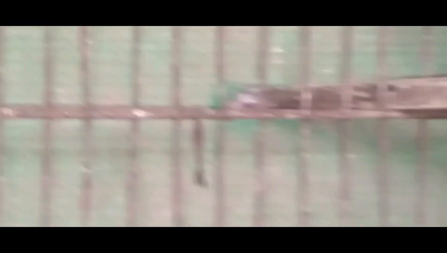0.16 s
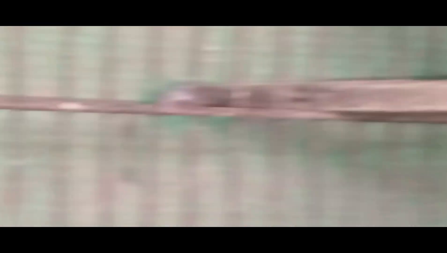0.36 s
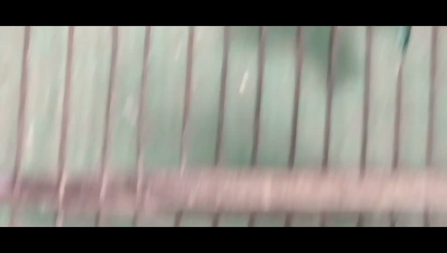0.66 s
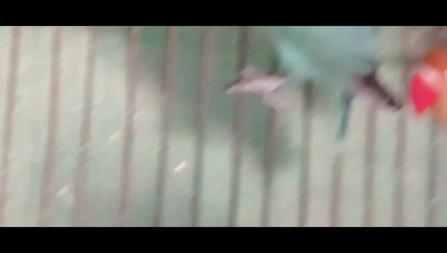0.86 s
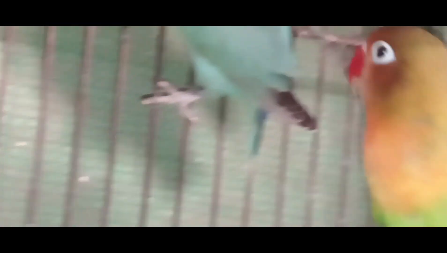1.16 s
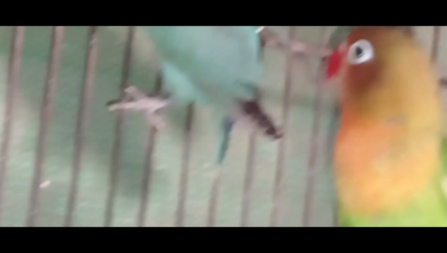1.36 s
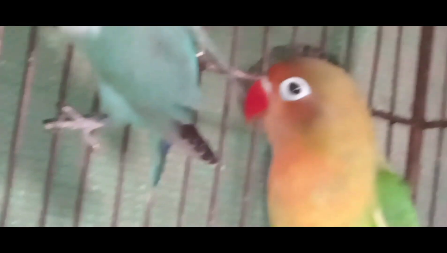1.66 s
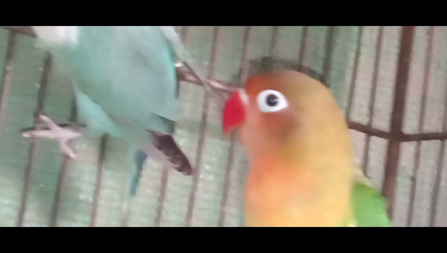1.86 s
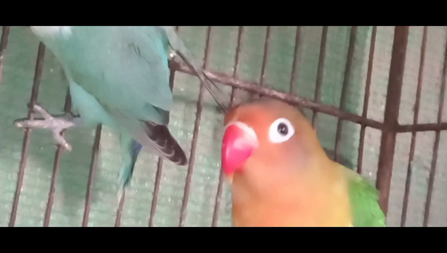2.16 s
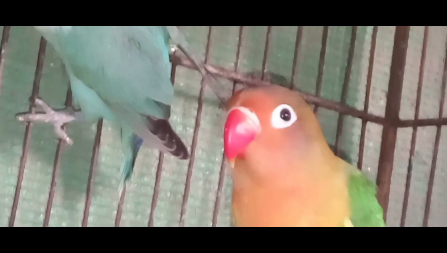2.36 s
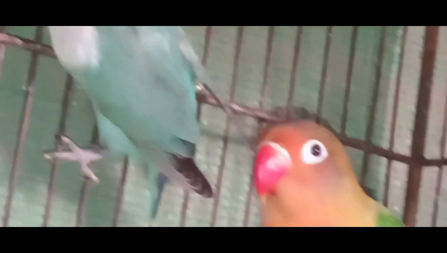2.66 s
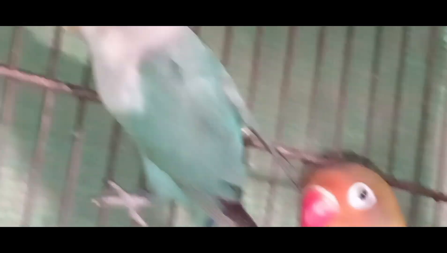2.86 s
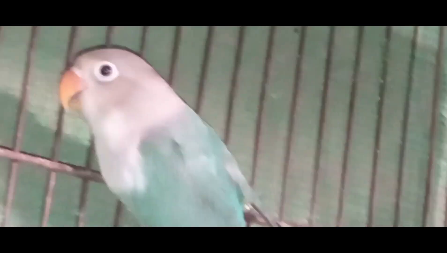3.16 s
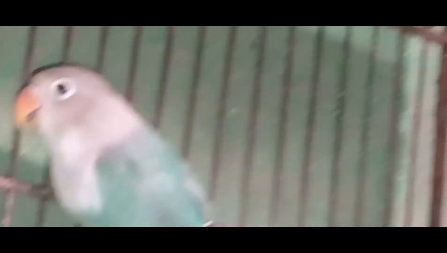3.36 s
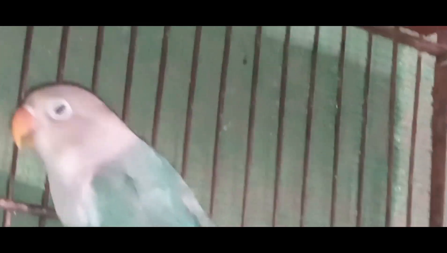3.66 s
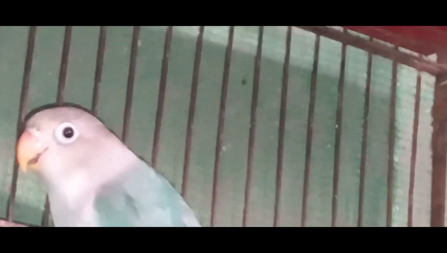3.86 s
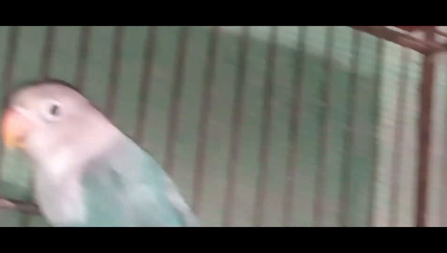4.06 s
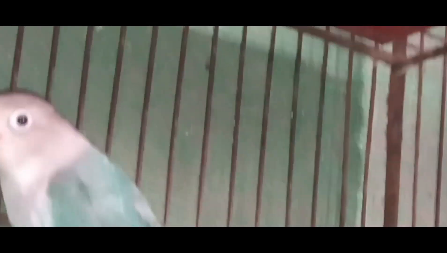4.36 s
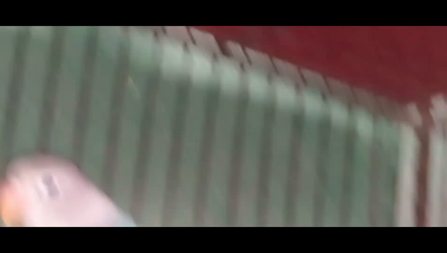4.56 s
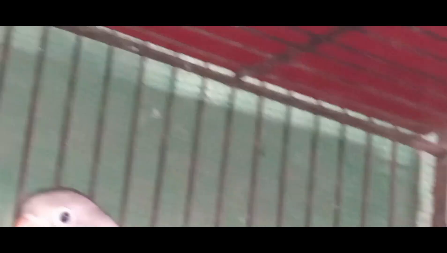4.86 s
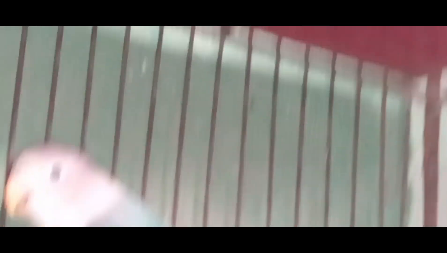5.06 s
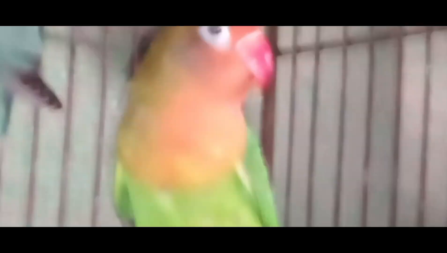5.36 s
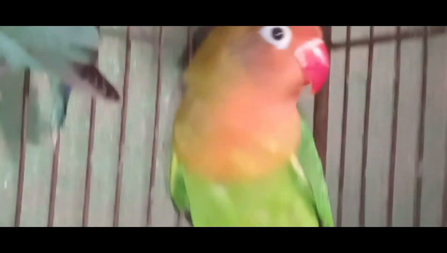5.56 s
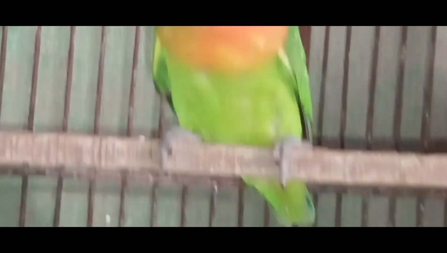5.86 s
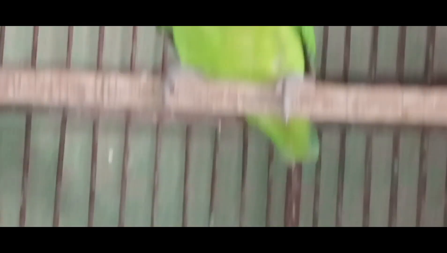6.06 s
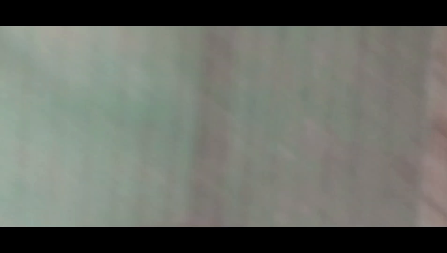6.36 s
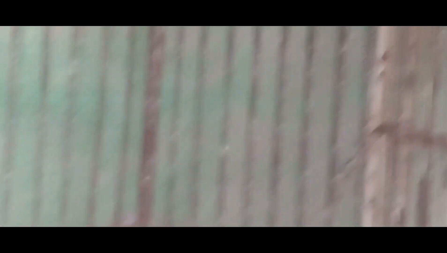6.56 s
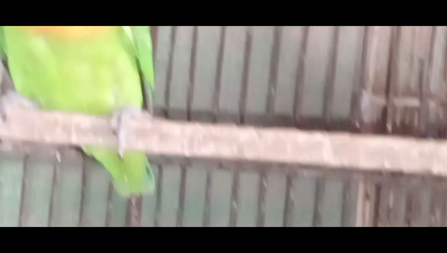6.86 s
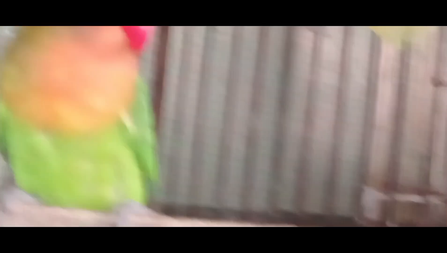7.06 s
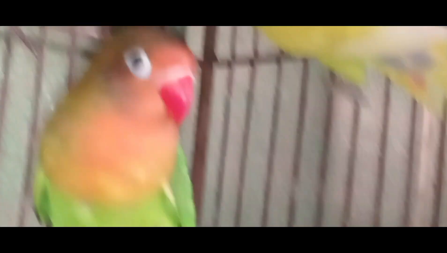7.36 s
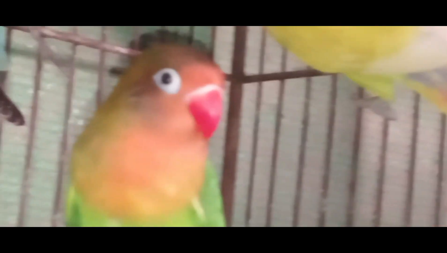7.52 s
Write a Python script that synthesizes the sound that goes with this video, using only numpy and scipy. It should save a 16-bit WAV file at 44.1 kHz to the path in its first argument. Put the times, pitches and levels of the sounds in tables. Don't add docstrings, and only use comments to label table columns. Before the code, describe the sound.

A steady fan rush and slowly beating mains hum fill a small echoing aviary. Two near whistles come early, then distant downward chirps, a harsh squawk, a third softer whistle with a sharp shriek, a hard perch knock and a fourth whistle. Quick peeps and claw taps crowd the last part, ending in low handling thumps. The handheld microphone briefly dips the background under loud calls.

```python
import sys
import numpy as np
from scipy import signal
from scipy.fft import rfft, irfft, next_fast_len
from scipy.io import wavfile
from scipy.ndimage import uniform_filter1d, map_coordinates

SR = 44100
rng = np.random.default_rng(int(sys.argv[2]) if len(sys.argv) > 2 else 0)


def transcribe(signal):
    frames = np.atleast_2d(signal).T
    limited = np.clip(frames, -1, 1)
    pcm = np.round(limited * 32767).astype(np.int16)
    wavfile.write(sys.argv[1], SR, pcm)


def ratio_of_db(decibels):
    return 10 ** (np.asarray(decibels, float) / 20)


N = 339129
T = np.arange(N) / SR


def unit(x):
    return x / np.sqrt(np.mean(x ** 2) + 1e-20)


def along(points, hz):
    f, v = np.transpose(points)
    return np.interp(np.log(hz + 1), np.log(f + 1), v)


def curves(rows):
    s, *cols = np.transpose(rows)
    return [np.interp(T, s, c) for c in cols] + [(T > s[0]) & (T < s[-1])]


def wobble(rate):
    return map_coordinates(rng.standard_normal(int(N * rate / SR) + 4), [T * rate])


def filtered(x, response):
    m = next_fast_len(N + SR // 2)
    return irfft(rfft(x, m) * response(np.fft.rfftfreq(m, 1 / SR)), m)[:N]


def turns(hz):
    return 2 * np.pi * np.cumsum(hz) / SR


def echoes(x, t60, gap):
    t = np.arange(SR // 2) / SR
    tail = rng.standard_normal(len(t)) * ratio_of_db(-60 * t / t60) * (t > gap)
    return signal.fftconvolve(x, tail / np.linalg.norm(tail))[:N]


def mains_hum():
    # pitch in Hz, level in dB; the first is the beating pair.
    hum_lines = [(100.4, 1), (200.8, -34), (258, -19), (301.2, -17)]
    second_share, first_null_s, beat_s = 0.92, 2.085, 4.08
    squeeze = 0.51
    (hz, db), *others = hum_lines
    phase = turns(hz + 0.16 * wobble(1.72))
    beat = 1 - second_share * np.exp(-2j * np.pi * (T - first_null_s) / beat_s)
    pair = np.imag(np.exp(1j * phase) * beat * np.abs(beat) ** (squeeze - 1))
    hum = np.sqrt(2) * ratio_of_db(db - 33 + 0.17 * wobble(14)) * pair
    for hz, db in others:
        hum += ratio_of_db(db - 31 + 2.85 * wobble(15)) * np.sin(turns(hz + 3 * wobble(11)))
    return hum


def fan():
    # frequency in Hz, level in dB per Hz.
    rush = [(15, -57), (32, -4), (48, 1), (150, 0.5), (260, -0.5), (480, -3), (1100, -6.5), (1500, -7.5),
            (2400, -7.5), (3300, -14.5), (6500, -16.5), (9500, -17), (12000, -28.5), (16000, -41.5)]
    # time in seconds, level in dB.
    ticking = [(0, -53.5), (.7, -50.5), (1.3, -56.5), (2, -59), (4, -65.5), (6.4, -57), (6.9, -50.5),
               (7.3, -50), (7.69, -49)]
    # frequency in Hz, level in dB.
    tick_colour = [(3000, -30), (6000, -8), (8500, 0), (10500, -6), (12500, -17), (15500, -21)]
    z = signal.stft(rng.standard_normal(N), nperseg=512)[2]
    patches = uniform_filter1d(rng.standard_normal(z.shape), size=8, axis=0)
    patches = uniform_filter1d(patches, size=8, axis=1)
    air = signal.istft(z * ratio_of_db(1.2 * unit(patches)), nperseg=512)[1][:N]
    air = unit(filtered(air, lambda f: ratio_of_db(along(rush, f))))
    air = ratio_of_db(-37 + 1.06 * wobble(1.3)) * air
    turn = turns(21.2 + .5 * wobble(2.3)) + 0.78
    rub = np.exp(2 * (np.cos(turn) - 1)) * ratio_of_db(2.5 * wobble(21))
    tick = unit(rub * filtered(rng.standard_normal(N), lambda f: ratio_of_db(along(tick_colour, f))))
    return air + ratio_of_db(curves(ticking)[0]) * tick


def knocks():
    # start in seconds, peak in dB, dull part in dB relative to the peak.
    clicks = [(0.176, -33, -3), (1.695, -23, -13), (1.7554, -27, 3), (4.139, -33, -13.5),
              (5.9364, -30.5, -13), (6.2588, -29, 0), (6.8987, -30.5, 2), (6.907, -26, -11),
              (7.0166, -24.5, 4), (7.0697, -27, -3), (7.446, -26, -12), (7.5717, -27, -11),
              (7.621, -30, -10), (7.634, -23, -10)]
    # start in seconds, level in dB, pitch in Hz.
    bumps = [
        (5.147, -7.5, 290),
        (6.2206, -19, 1000),
        (6.259, -9.5, 1900),
        (7.414, -21, 95),
        (7.471, -21, 68.2),
        (7.539, -16, 117),
        (7.605, -21, 69.4),
    ]
    # frequency in Hz, level in dB.
    wire_colour = [(500, -40), (4000, -13), (8500, -5.5), (11000, -11.5), (16000, -23)]
    perch_colour = [(250, -22), (800, -9.5), (2200, -3.5), (3800, -17), (7000, -31), (16000, -63)]
    wire, perch, swings = np.zeros((3, N + SR))
    t = np.arange(SR // 20) / SR
    for s, db, low_db in clicks:
        noise = rng.standard_normal((2, len(t))) * ratio_of_db(-60 * t / 0.038)
        wire[round(s * SR):][:len(t)] += ratio_of_db(db + 4.0) * noise[0]
        perch[round(s * SR):][:len(t)] += ratio_of_db(db + low_db + 7.0) * noise[1]
    for s, db, hz in bumps:
        swing = np.sin(2 * np.pi * hz * t) * np.exp(-t * hz * 3.55) * (1 - np.exp(-t / 0.00007))
        puff = 0.12 * ratio_of_db(-60 * t / 0.036) * (1 - np.exp(-t / 8e-4)) * rng.standard_normal(len(t))
        swings[round(s * SR):][:len(t)] += ratio_of_db(db + 7.0) * swing
        pull = np.exp(-((t * hz - .45) / 0.41) ** 2)
        swings[round((s - .6 / hz) * SR):][:len(t)] -= ratio_of_db(db - 13.0) * pull
        perch[round(s * SR):][:len(t)] += ratio_of_db(db) * puff
    dull = filtered(perch[:N], lambda f: ratio_of_db(along(perch_colour, f)))
    low = filtered(swings[:N], lambda f: 1j * f / (45 + 1j * f) / (1 + 1j * f / 2600) ** 2)
    return low + dull + filtered(wire[:N], lambda f: ratio_of_db(along(wire_colour, f)))


def far_birds():
    # start in seconds, length in seconds, top pitch in Hz, level in dB.
    far_calls = [(0.736, 0.17, 6680, -46), (1.187, 0.13, 7190, -45), (1.555, 0.13, 7040, -45.5),
                 (1.968, .1, 6300, -45), (3.475, 0.16, 6860, -38.5), (3.899, 0.13, 7020, -36),
                 (4.27, 0.14, 6760, -39), (4.627, .15, 6860, -38), (5.089, .16, 6580, -38.5),
                 (5.523, 0.12, 6170, -38), (5.835, 0.09, 5300, -41), (6.875, 0.16, 6290, -39),
                 (7.313, 0.14, 6600, -37)]
    # share of its length, share of its top pitch, level change in dB.
    sweep_shape = [(-.1, .86, -10), (0, 1, 0), (.22, .84, 4), (.5, .65, 0), (.75, .53, 3), (.92, .5, -3),
                   (1.15, .4, -14), (1.4, .33, -11), (1.65, .3, -17)]
    # start in seconds, peak in dB, pitch in Hz, length in seconds.
    peeps = [(0.623, -38, 2260, 0.02), (3.506, -27.5, 3280, 0.02), (3.5443, -36, 3290, 0.02),
             (3.713, -26.5, 3420, 0.022), (3.766, -33, 3470, 0.03), (4.197, -32, 3630, 0.015),
             (4.887, -30.5, 3490, 0.02), (6.045, -20.5, 3010, 0.0093), (6.143, -32, 3260, 0.018),
             (6.1918, -29, 3110, 0.024), (6.34, -27, 2905, 0.015), (6.483, -28, 2400, 0.015),
             (6.717, -30.5, 3840, 0.011), (6.781, -32, 3330, 0.016), (7.628, -29.5, 3110, 0.02),
             (0.628, -36, 3200, 0.026), (2.118, -29, 2380, 0.044), (6.265, -39, 3650, 0.05),
             (6.4, -38, 2110, .03), (6.535, -36, 3400, 0.044), (6.61, -32, 2150, 0.027),
             (6.734, -32, 2300, 0.019), (7.095, -36, 2080, .04)]
    # time in seconds, pitch in Hz, level in dB.
    squeal = [(3.09, 15014, -78), (3.102, 14968, -67), (3.248, 15027, -57), (3.36, 14752, -66),
              (3.378, 14782, -59), (3.49, 14678, -74), (3.5, 14340, -95)]
    out = np.zeros(N)
    for s, length, top_hz, db in far_calls:
        rows = [(s + u * length, share * top_hz, db + d) for u, share, d in sweep_shape]
        hz, level_db, gate = curves(rows)
        phase = turns(hz * (1 + 0.034 * wobble(350)))
        x = gate * ratio_of_db(level_db + 1.64 * wobble(200)) * np.sin(phase)
        out += .3 * x + 1.2 * echoes(x, t60=.18, gap=.001)
    for s, db, hz, length in peeps:
        peak = s + .003
        slope_s = np.where(T < peak, .012, 3 * length)
        level_db = db - 60 * np.abs(T - peak) / slope_s
        x = ratio_of_db(level_db) * np.sin(turns(hz * (1 + 0.025 * wobble(300))))
        out += 0.54 * x + .5 * echoes(x, t60=0.091, gap=0.0045)
    hz, db, gate = curves(squeal)
    return out + gate * ratio_of_db(db + 4 + 4 * wobble(60)) * np.sin(turns(hz * (1 + .004 * wobble(200))))


def whistle_shape(s, rise, hold, fall, top_hz, first_hz, leap, glide_db, held_db, over_db, fall_db):
    arch = [(0, 0.95), (.2, 0.97), (.45, 0.99), (.75, .987), (1, .962)]
    # frequency in Hz, level in dB.
    windpipe = [(1720, -24), (2000, -7.5), (2160, -1.5), (2460, -10), (2800, -15)]
    knee_hz, last_hz, release_s = 2468, 1950, 0.0038
    on = s + rise + leap
    off = on + hold
    end = off + fall
    rows = [(s, first_hz, 0), (s + rise, knee_hz, 0)]
    rows += [(on + u * hold, share * top_hz, 1) for u, share in arch]
    rows += [(off + fall / 2, knee_hz, 0), (end, last_hz, 0), (end + release_s, last_hz, 0)]
    hz, full, gate = curves(rows)
    late = T > off
    dying_db = -30 * np.maximum(T - end, 0) / release_s
    db = full * held_db + (1 - full) * (glide_db + along(windpipe, hz) + fall_db * late)
    gliding_db = over_db + 9 * np.exp(-np.abs(T - s) / 0.016) - 8 * late
    overtone_db = full * (held_db - 34.5) + (1 - full) * gliding_db
    return hz, db + dying_db, overtone_db + dying_db, gate


def whistles():
    # start, rise, hold and fall in seconds, top pitch in Hz.
    calls = [
        (1.695, .062, 0.14, 0.038, 3065),
        (2.155, .08, .195, 0.026, 3116),
        (4.946, .062, .08, .04, 3152),
        (5.539, .052, .124, .012, 3060),
    ]
    # first pitch in Hz, leap in seconds, then glide, held note and glide overtones in dB.
    voices = [(1700, .02, -20, -14, -39), (1710, 0.018, -22, -16, -41), (1872, .028, -27, -33, -41),
              (1806, 0.036, -18, -15, -33)]
    # level of the drop against the rise, in dB.
    falls_db = [-7, 0, -2, -6]
    wets = [0, 0, .8, .1]
    # lift of the higher overtones, in dB.
    brights_db = [4.1, 2.5, 8, 12.5]
    # multiple of the pitch, level in dB.
    overtones = [(1.5, -21), (2, -1), (3, 0.5), (4, -14), (5, -11)]
    # time in seconds, depth in dB, width in milliseconds.
    fades = [(1.7925, 6, 2.2), (1.8235, 9, 1.8), (1.846, 9.5, 15), (1.931, 21, 8.5), (2.26, 14, 3),
             (2.283, 30, 1.8), (2.3106, 13, 14), (2.355, 9, 8.1), (2.3901, 25, 5.9), (2.4024, 28, 20),
             (2.425, 9, 10), (5.0558, 20, 12), (5.632, 25, 4.8), (5.6463, 8, 8), (5.675, 14, 11),
             (5.6887, 29, 5.6), (5.7192, 14.5, 12), (5.7388, 27, 1.7)]
    fade_db = sum(db * np.exp(-((T - s) / (ms * 0.00094)) ** 2) for s, db, ms in fades)
    out = np.zeros(N)
    for call, voice, fall_db, wet, bright_db in zip(calls, voices, falls_db, wets, brights_db):
        hz, db, over_db, gate = whistle_shape(*call, *voice, fall_db)
        held = np.clip((hz - 2600) / 300, 0, 1) * gate * (1 - wet)
        shake = .002 * wobble(150) + (.014 + .03 * wet) * (1 - held) * wobble(400)
        phase = turns(hz * (1 + shake))
        flutter_db = 4 * (1 - held) * wobble(160)
        tone = gate * np.sqrt(2) * ratio_of_db(db + flutter_db) * np.sin(phase)
        opening_db = bright_db - 5 - 17 * (1 - held)
        over = np.zeros(N)
        for k, level in overtones:
            over += ratio_of_db(level + 2.4 * wobble(60) + (k != 2) * opening_db) * np.sin(k * phase)
        over = gate * ratio_of_db(over_db + 7.0 - 0.14 * fade_db) * over
        late = T > sum(call[:3])
        glide = tone * (1 - held) * (1 - .6 * (1 - wet) * late)
        glide = ratio_of_db(-.5 + 2.5 * wet) * echoes(glide, t60=.2, gap=.003)
        tail = ratio_of_db(-8 + 4 * wobble(70)) * echoes(tone * held, t60=0.21, gap=0.005)
        tail = tail * (1 - 0.5 * uniform_filter1d(held, size=400))
        out += ratio_of_db(-fade_db) * (1 - 0.21 * wet) * tone + glide + tail
        out += (.4 + .6 * held) * (1 - .6 * wet) * over
        out += ratio_of_db(-3) * echoes(over, t60=.18, gap=.003)
    return out


def ducking(spared_db):
    # start in seconds, hold in seconds, depth in dB.
    drops = [
        (1.8, .125, 6),
        (2.28, .15, 5.5),
        (5.03, .075, 12),
        (5.67, .09, 6),
    ]
    db = np.zeros(N)
    for s, hold, depth in drops:
        recovery = np.exp(-np.maximum(T - s - hold, 0) / 0.019)
        db += max(depth - spared_db, 0) * (T > s) * recovery
    return ratio_of_db(-uniform_filter1d(db, size=200))


def squawk():
    # time in seconds, pitch in Hz, level in dB.
    cry = [(4.47, 1017, -46), (4.495, 1022, -35.5), (4.515, 1052, -30.5), (4.57, 1060, -29.5),
           (4.64, 1043, -29), (4.67, 1007, -37), (4.688, 1040, -40)]
    # centre in Hz, width in Hz, level in dB.
    resonances = [(2260, 48, -4), (3290, 200, -1), (4170, 57, -7), (4500, 50, 2), (5130, 114, -9),
                  (6210, 48, -26), (7340, 240, -5.5), (8200, 55, -2.5), (9470, 140, -9), (10200, 23, -10)]
    hz, db, gate = curves(cry)
    cycles = np.floor(turns(hz * (1 + .02 * wobble(400))) / (2 * np.pi))
    pulses = np.diff(cycles, prepend=0) * ratio_of_db(4 * rng.standard_normal(N))
    source = unit(pulses) + .9 * rng.standard_normal(N)
    burst_db = -12 * ((51 * (T - 4.507)) % 1)
    throb = uniform_filter1d(ratio_of_db(burst_db + 2 * wobble(200)), size=130)

    def throat(f):
        total = .1 * (f > 900) + .1 * (f > 1900)
        for k, (centre, width, level_db) in enumerate(resonances):
            damping = 1j * f * 3 * width
            total = total + (-1) ** k * ratio_of_db(level_db) * damping / (centre * centre - f * f + damping)
        return total / (1 + (f / 11000) ** 24)

    x = ratio_of_db(db) * unit(filtered(gate * throb * source, throat)) * np.sqrt(gate.mean())
    return x + ratio_of_db(-8) * echoes(x, t60=.15, gap=.004)


def shriek():
    # time in seconds, pitch in Hz, level in dB, octave level in dB.
    cry = [
        (5.0255, 5560, -58, -50),
        (5.0285, 5630, -12, -25),
        (5.032, 5880, -28, -46),
        (5.038, 4700, -26, -37),
        (5.0433, 5590, -11.5, -26),
        (5.046, 6230, -31, -34),
        (5.054, 6610, -17.5, -34),
        (5.075, 6554, -34, -60),
        (5.16, 6450, -49, -72),
    ]
    hz, db, octave_db, gate = curves(cry)
    phase = turns(hz * (1 + 0.015 * wobble(500)))
    halfway = 1.4 * (T < 5.034) * np.sin(1.5 * phase)
    x = ratio_of_db(db) * np.sin(phase) + ratio_of_db(octave_db) * (np.sin(2 * phase) + halfway)
    x = gate * x * (1 + 0.04 * rng.standard_normal(N) * (T < 5.047))
    return np.sqrt(2) * x + ratio_of_db(-6.0) * echoes(x, t60=0.15, gap=0.0019)


def handling():
    # time in seconds, level in dB.
    rumble = [
        (7.35, -62),
        (7.42, -30),
        (7.5, -43),
        (7.545, -30),
        (7.6, -41),
        (7.69, -37),
    ]
    db, gate = curves(rumble)

    def housing(f):
        return (f / 45) ** 2 / (1 + (f / 45) ** 2) / (1 + (f / 230) ** 4)

    body = filtered(rng.standard_normal(N), housing)
    return gate * ratio_of_db(db) * unit(body * ratio_of_db(3.4 * wobble(35)))


def scene():
    near = knocks() + whistles() + shriek() + handling()
    room = fan() + far_birds() + squawk()
    return (near + ducking(6) * mains_hum() + ducking(0) * room)[None]


def low_pass(x):
    return signal.sosfilt(signal.butter(12, 16490, fs=SR, output="sos"), x)


def record(dry):
    mix = filtered(dry[0], lambda f: f < 15500)[None]
    return low_pass(mix)


dry = scene()
out = record(dry)
transcribe(out)
```